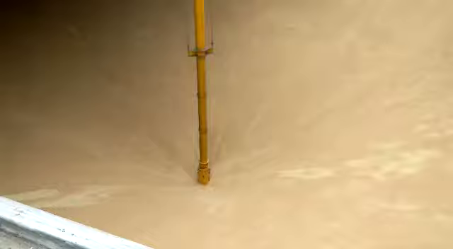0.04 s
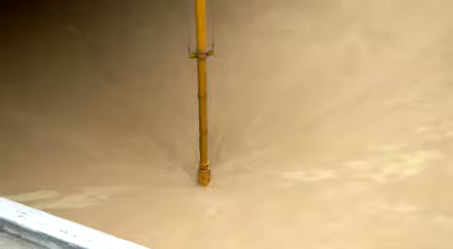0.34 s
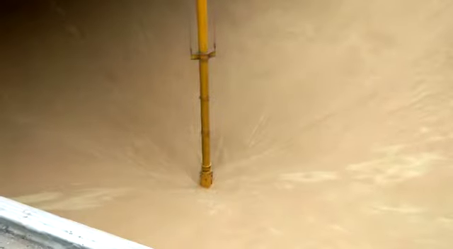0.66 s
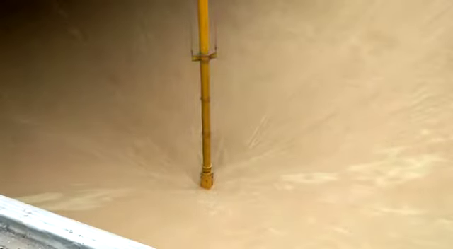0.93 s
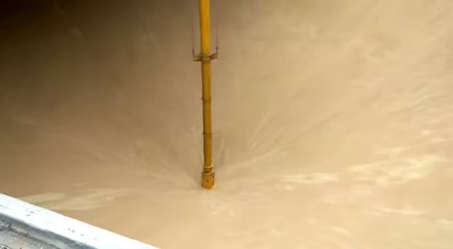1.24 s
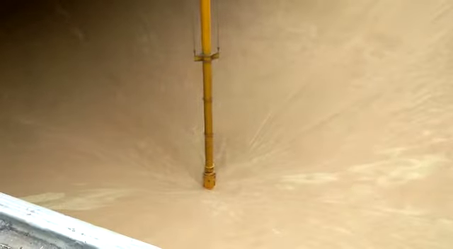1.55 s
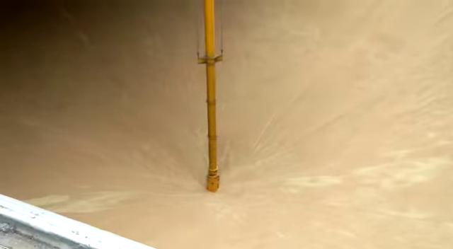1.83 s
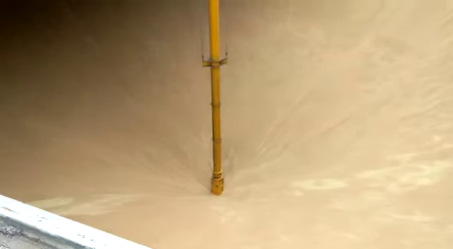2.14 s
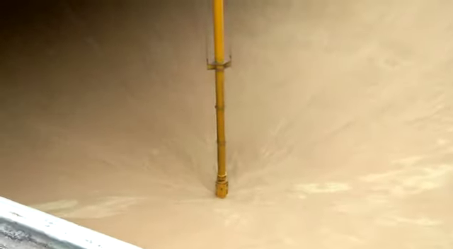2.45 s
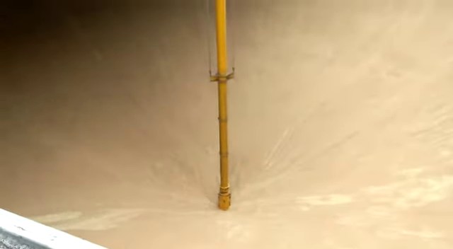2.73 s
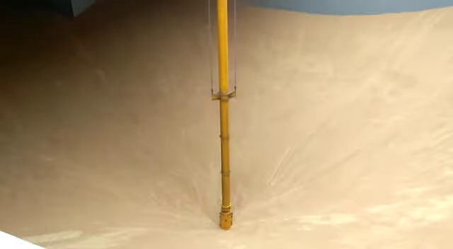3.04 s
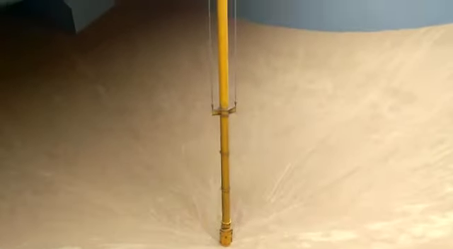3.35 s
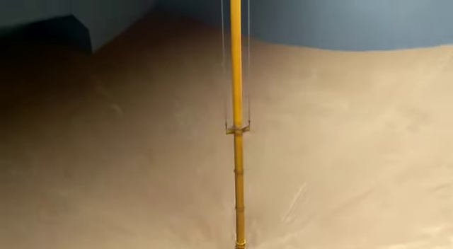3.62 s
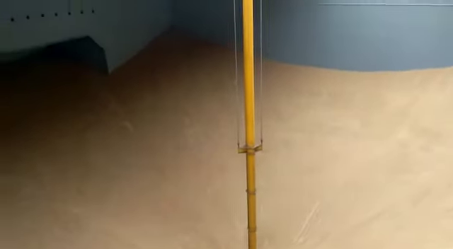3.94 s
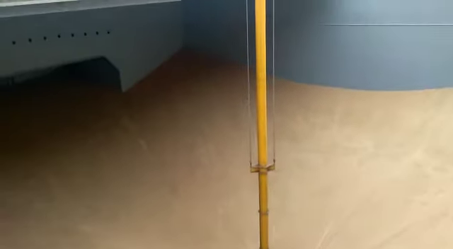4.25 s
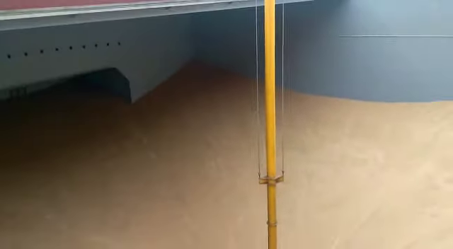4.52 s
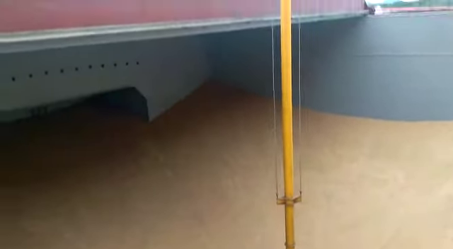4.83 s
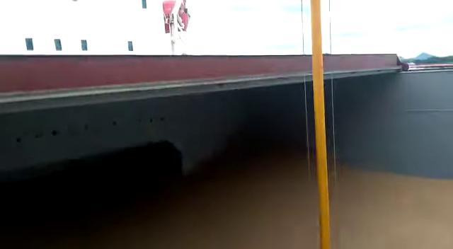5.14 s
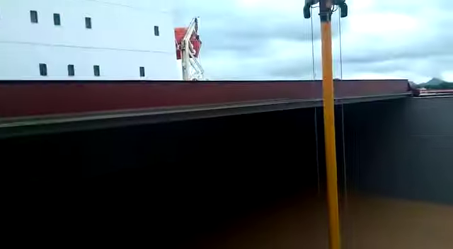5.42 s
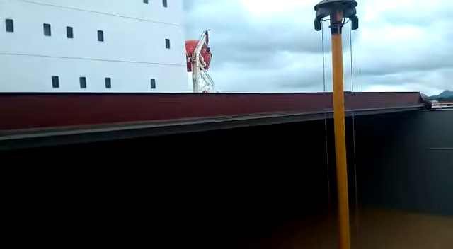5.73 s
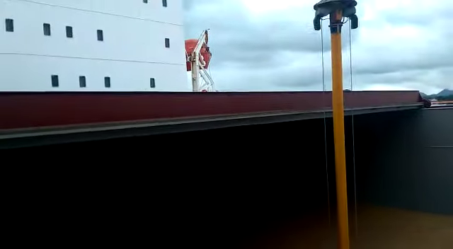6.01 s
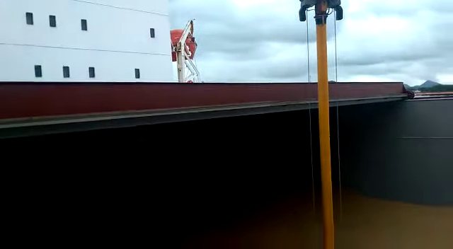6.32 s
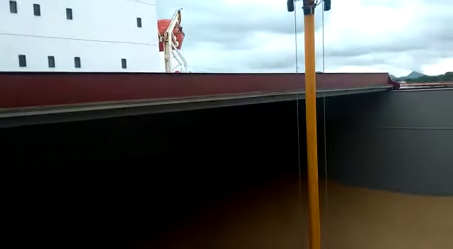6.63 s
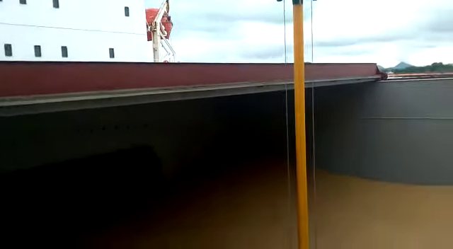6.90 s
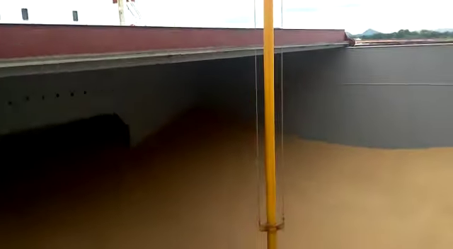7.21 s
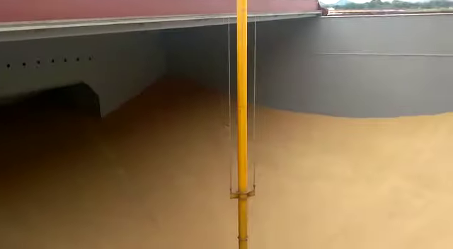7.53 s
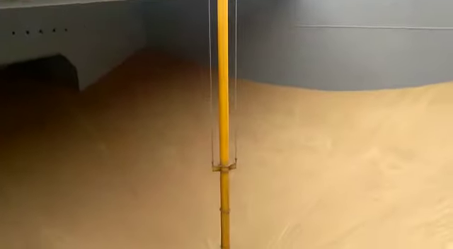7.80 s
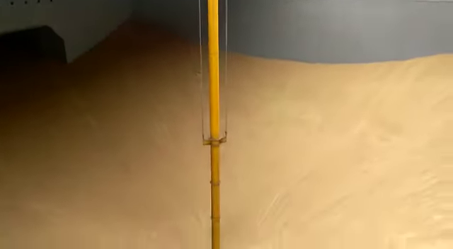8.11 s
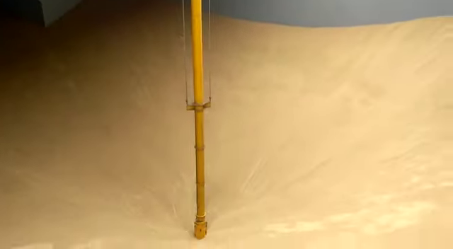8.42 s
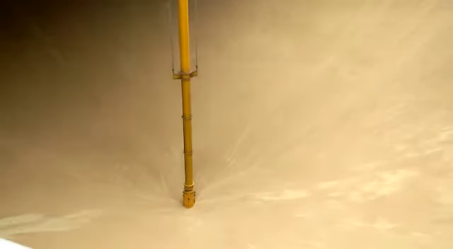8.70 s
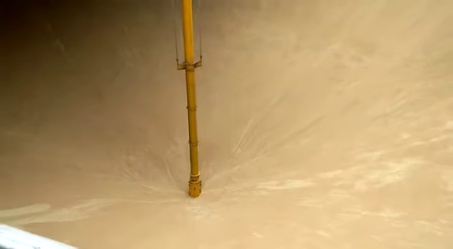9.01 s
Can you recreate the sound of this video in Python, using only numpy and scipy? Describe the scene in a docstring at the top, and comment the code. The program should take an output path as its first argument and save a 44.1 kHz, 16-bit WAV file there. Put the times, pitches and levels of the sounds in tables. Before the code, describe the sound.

After a brief silence, a suction unloader is heard drawing grain from a ship's steel hold. Kernels hiss and tick up the pipe over a loud, booming roar of air and machinery, with low motor hum and a faint blower whine. The rush shudders with the flow, and the pipe twice rings thinly. The microphone, outdoors at the hatch rim, takes a soft bump past halfway.

```python
"""After a beat of silence, a rush of grain cuts in and swells quickly to full level.
A suction unloader is emptying a ship's steel hold, heard from the hatch rim. Kernels hiss and tick up
the pipe over a booming roar of air and machinery; motors hum and a blower whines faintly. Slugs of
grain make the rush shudder, and twice the pipe rings out in heavy flow. Past halfway the microphone
tilts up toward the machinery, takes a soft bump from the hand and sinks back."""
import sys
import numpy as np
from scipy import signal
from scipy.fft import rfft, irfft, next_fast_len
from scipy.io import wavfile
from scipy.ndimage import uniform_filter1d

SR = 44100
rng = np.random.default_rng(int(sys.argv[2]) if len(sys.argv) > 2 else 0)


def generate_wav(sig):
    """Save sig (samples, or channels by samples) to the path in sys.argv[1] as 16-bit PCM at SR."""
    pcm = np.round(np.clip(np.atleast_2d(sig).T, -1, 1) * 32767).astype(np.int16)
    wavfile.write(sys.argv[1], SR, pcm)


N = 399546

# slow ride of the hiss with the grain flow: t/s, level/dB
GRAIN_FLOW = [(0.5, -18.6), (1.25, -19), (1.55, -17.8), (2.4, -18.1), (3.5, -19), (4.9, -18.9),
              (5.9, -18.4), (6.6, -17.7), (9.06, -18.3)]
# tone of the kernel hiss: f/Hz, level/dB
HISS_SPECTRUM = [(1200, -36), (2500, -14.5), (3400, -5), (4000, -4.5), (4700, -4), (5300, 0), (5950, -1),
                 (6600, -7.5), (7750, -4.5), (8900, -9.5), (10200, -10), (10900, -15.5), (12500, -16.5),
                 (14200, -18)]
# ride of the fizz on top of the hiss: t/s, level/dB
FIZZ_RIDE = [(0.5, .4), (6.2, .1), (6.5, -1.2), (7.9, -1.3), (9.06, -.1)]
# tone of the air and machinery: f/Hz, level/dB
ROAR_SPECTRUM = [(20, -29), (35, -31), (52, -21), (90, -9.5), (160, -2.5), (400, 1), (720, -1.5),
                 (1020, -5.5), (1250, -1.5), (1600, -6.5), (1950, -5), (2600, -13), (4500, -33)]
# booms and dips of hold and pipe: f/Hz, width/Hz, level/dB
HOLD_BOOMS = [(63, 6, 4), (79, 6, 4), (150, 14, 1.5), (188.5, 23, 4.5), (256, 18, -3.5), (278, 16, 3.5),
              (307, 8, -2), (407, 45, 1), (456, 17, -2)]
# scoops in both hiss and roar: f/Hz, width/Hz, level/dB
HOLLOWS = [(2281, 240, -20.5), (4528, 500, -11.5), (6970, 460, -3.5), (13360, 550, -11)]
# likeness of left and right: f/Hz, likeness/0-1
STEREO_LIKENESS = [(25, .55), (43, .68), (64, .95), (140, 0.99), (450, .988), (700, 1), (850, 1), (3800, 1),
                   (4500, 0.92), (5400, 0.9), (6300, 0.9), (8000, 0.71), (10000, 0.68), (11500, .77),
                   (13000, .76), (13800, .99)]
# motor tones: f/Hz, level/dB
MOTOR_HUMS = [(80, -54), (188.4, -48.5), (276, -47), (283, -50), (401, -47.8)]
# big slugs of grain (+) and gaps in the feed (-): t/s, level/dB
SLUGS = [(0.74, 1.7), (1.01, 1.7), (1.89, -1.6), (3.3, -1.2), (3.66, -2.2), (5.19, 1.8), (5.45, -1.5),
         (5.57, 1.3), (6.05, 2), (6.22, -1.2), (6.34, 1.7), (6.63, 1.2), (6.85, -1.1), (7.08, 1.3),
         (8.33, 1.3)]
# swells of the pipe ring in heavy flow: t/s, half-length/s, level/dB
RING_SWELLS = [(1.75, .6, 10), (6.65, .5, 14)]
# microphone aim, from hold (0) to machinery (1): t/s, tilt/0-1
MIC_TILT = [(2.8, 0), (4.9, .45), (5.5, 1), (7.0, .75), (9.06, .3)]
# lead of the left port in the bass: f/Hz, phase/rad
BASS_LEAD = [(20, .2), (45, .95), (65, 1), (96, .82), (150, 0.5), (320, 0.3), (750, 0)]
# echo in the right port: f/Hz, strength/0-1; then its comb spacing
PORT_ECHO, COMB_HZ = [(3800, .0016), (4500, .53), (6600, .64), (9000, .66), (11000, .38),
                      (13500, .1)], 2160


def gain_of(db):
    """Decibels to amplitude."""
    return 10 ** (np.asarray(db) / 20)


def unit_rms(x):
    """Scales to rms 1."""
    return x / np.sqrt(np.mean(x ** 2) + 1e-20)


def curve_at(points, hz):
    """Reads a curve on a log-frequency axis."""
    f, value = np.transpose(points)
    return np.interp(np.log(hz + 1), np.log(f + 1), value)


def ride(rows):
    """A fader move through timed points, at every sample."""
    return np.interp(np.arange(N) / SR, *np.transpose(rows))


def swell(at_s, half_s):
    """A smooth rise and fall of height 1."""
    return np.exp(-((np.arange(N) / SR - at_s) / half_s) ** 2)


def bells(rows, hz):
    """Summed bell boosts and cuts, in dB."""
    return sum(db / (1 + (2 * (hz - f) / width) ** 2) for f, width, db in rows)


def filtered(x, response):
    """Applies a gain given as a function of frequency."""
    size = next_fast_len(N + 8192)
    return irfft(rfft(x, size) * response(np.fft.rfftfreq(size, 1 / SR)), size)[..., :N]


def flutter(low_hz, high_hz):
    """Random wavering of rms 1, mostly between two rates."""
    noise = rng.standard_normal(N)
    return unit_rms(filtered(noise, lambda hz: hz / (hz + low_hz) / (1 + (hz / high_hz) ** 2)))


def mottled(pair, depth_db, size, bins, frames):
    """Random patches of lift and dip, `bins` wide and `frames` long, on windows of `size` samples."""
    window = dict(nperseg=size, noverlap=size * 3 // 4)
    spectra = signal.stft(pair, **window)[2]
    patches = uniform_filter1d(rng.standard_normal(spectra.shape[1:]), bins, axis=0)
    patches = unit_rms(uniform_filter1d(patches, frames, axis=1))
    return signal.istft(spectra * gain_of(depth_db * patches), **window)[1][:, :N]


def turbulence(patch_db, ripple_db):
    """Stereo noise with brief, wide turbulent patches and narrow, shifting ripples off the steel walls."""
    churn = mottled(rng.standard_normal((2, N)), patch_db, size=512, bins=8, frames=17)
    return mottled(churn, ripple_db, size=2048, bins=4, frames=130)


def voiced(pair, tone_db):
    """Gives two unrelated signals one scooped tone and blends them as mid and side."""
    likeness = lambda hz: np.clip(curve_at(STEREO_LIKENESS, hz), 0, 1)
    tone = lambda hz: gain_of(tone_db(hz) + bells(HOLLOWS, hz))
    mids = filtered(pair, lambda hz: tone(hz) * np.sqrt(1 + likeness(hz)))
    mid = unit_rms(mids[0])
    side = filtered(pair[1], lambda hz: tone(hz) * np.sqrt(1 - likeness(hz))) / np.std(mids[1])
    return np.array([mid + side, mid - side])


def kernel_ticks(per_s=2500, spread_db=2.7):
    """Kernels strike the pipe wall: many light hits, a few hard ones."""
    strength = gain_of(spread_db * np.minimum(rng.exponential(1, (2, N)), 6))
    polarity = rng.choice([-1, 1], (2, N))
    hits = rng.random((2, N)) < per_s / SR
    return unit_rms(strength * polarity * hits)


def grain_hiss(tick_db=-9, fizz_hz=6800):
    """A dense rush of kernels with single ticks poking out; the top dulls a little late on."""
    rush = turbulence(patch_db=.77, ripple_db=1.6)
    ticks = gain_of(tick_db) * kernel_ticks()
    hiss = voiced(rush + ticks, lambda hz: curve_at(HISS_SPECTRUM, hz))
    body = filtered(hiss, lambda hz: 1 / (1 + (hz / fizz_hz) ** 8))
    return body + (hiss - body) * gain_of(ride(FIZZ_RIDE))


def air_roar(slug_db, base_db=-28.3, tilt_db=2.1, rumble_hz=170, rumble_db=-.3):
    """Turbulent air and machinery boom in the steel hold; the deep rumble ignores the slugs."""
    air = turbulence(patch_db=.7, ripple_db=.9)
    air = voiced(air, lambda hz: curve_at(ROAR_SPECTRUM, hz) + bells(HOLD_BOOMS, hz))
    rumble = filtered(air, lambda hz: 1 / (1 + (hz / rumble_hz) ** 4))
    roar = (air - rumble) * gain_of(slug_db) + rumble * gain_of(rumble_db)
    return roar * gain_of(base_db + tilt_db * ride(MIC_TILT))


def motor_hum(drift_hz=.87, waver_db=2):
    """Low, wavering motor tones, half buried in the roar."""
    hum = np.zeros(N)
    for hz, db in MOTOR_HUMS:
        level = gain_of(db + waver_db * flutter(.27, 3.7))
        cycles = np.cumsum(hz + drift_hz * flutter(.27, 4)) / SR
        hum += level * np.sin(2 * np.pi * cycles)
    return np.sqrt(2) * hum


def blower_whine(blade_hz=2006, drift_hz=1.2, base_db=-45, tilt_db=-7, waver_db=2.5):
    """The blade tone wavers through the open air and recedes as the microphone tilts up."""
    cycles = np.cumsum(blade_hz + drift_hz * flutter(.2, 2.8)) / SR
    level_db = base_db + tilt_db * ride(MIC_TILT) + waver_db * flutter(.5, 6)
    return np.sqrt(2) * np.sin(2 * np.pi * cycles) * gain_of(level_db)


def grain_slugs(half_s=.05):
    """Each slug or gap in the feed briefly lifts or ducks the suction, in dB."""
    return sum(db * swell(at_s, half_s) for at_s, db in SLUGS)


def pipe_ring(ring_hz=5350, width_hz=110, base_db=-44):
    """The rush excites one narrow mode of the pipe, which twice sings out of the hiss."""
    ring = filtered(rng.standard_normal(N), lambda hz: 1 / (1 + (2 * (hz - ring_hz) / width_hz) ** 2))
    lift_db = sum(db * swell(at_s, half_s) for at_s, half_s, db in RING_SWELLS)
    return unit_rms(ring) * gain_of(base_db + lift_db)


def hand_bump(at_s=5.6, half_s=.025, level_db=-46, top_hz=55):
    """A hand nudges the microphone: a soft, low thud, unrelated in the two ports."""
    thud = filtered(rng.standard_normal((2, N)), lambda hz: 1 / (1 + (hz / top_hz) ** 4))
    return unit_rms(thud) * gain_of(level_db) * swell(at_s, half_s)


def scene(roar_surge_db=.62, grain_surge_db=.66):
    """The mix: a few big slugs and many small surges make hiss and roar shudder together."""
    slug_db = grain_slugs()
    surge = flutter(low_hz=4.5, high_hz=29)
    roar = air_roar(slug_db)
    grain = grain_hiss() * gain_of(ride(GRAIN_FLOW) + slug_db) + pipe_ring()
    suction = grain * gain_of(grain_surge_db * surge) + roar * gain_of(roar_surge_db * surge)
    return suction + motor_hum() + blower_whine() + hand_bump()


def mic_ports(hz):
    """The right port lags in the bass and is combed by a short echo; the mono sum stays flat."""
    echo = curve_at(PORT_ECHO, hz) * np.exp(-2j * np.pi * hz / COMB_HZ)
    right = (1 - echo) * np.exp(-1j * curve_at(BASS_LEAD, hz))
    return 2 * np.array([np.ones_like(right), right]) / (1 + right)


def record(dry, on_s=.2295, fade_from_db=-12.5, settle_s=.125, top_hz=14300):
    """The microphone switches on with a quick fade-in, through its two ports and a steep high cut."""
    since_on = np.arange(N) / SR - on_s
    fade_in = (since_on > 0) * gain_of(fade_from_db * np.exp(-np.maximum(since_on, 0) / settle_s))
    high_cut = signal.firwin(1023, top_hz, window=("kaiser", 9), fs=SR)
    return signal.oaconvolve(filtered(dry, mic_ports) * fade_in, high_cut[None], "same")


dry = scene()
out = record(dry)
generate_wav(out)
```